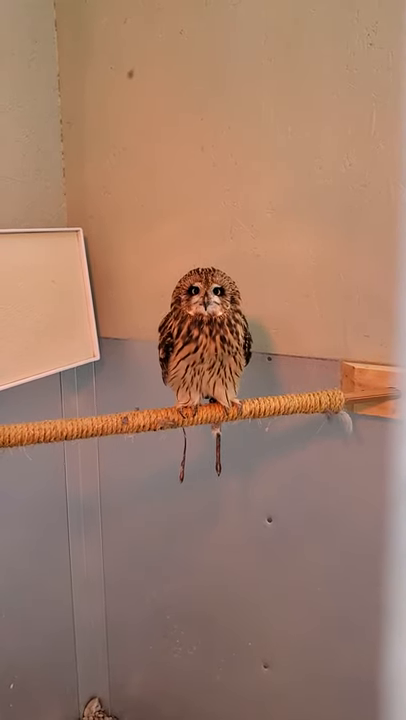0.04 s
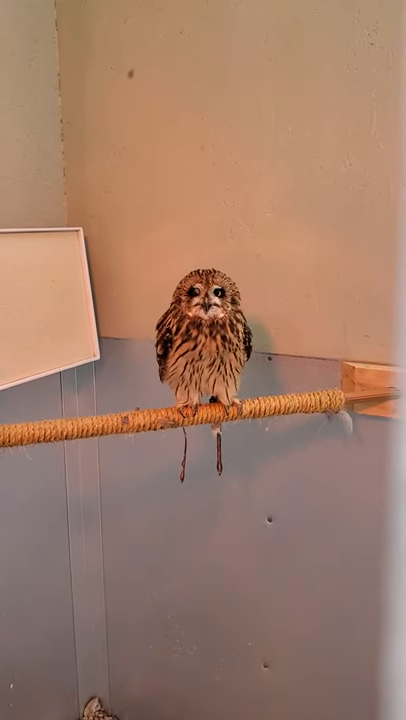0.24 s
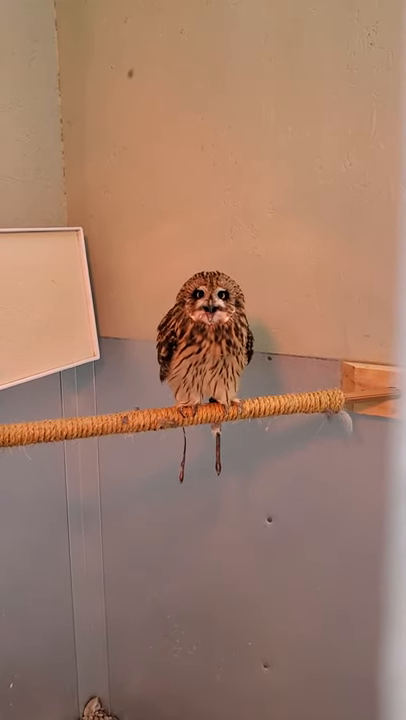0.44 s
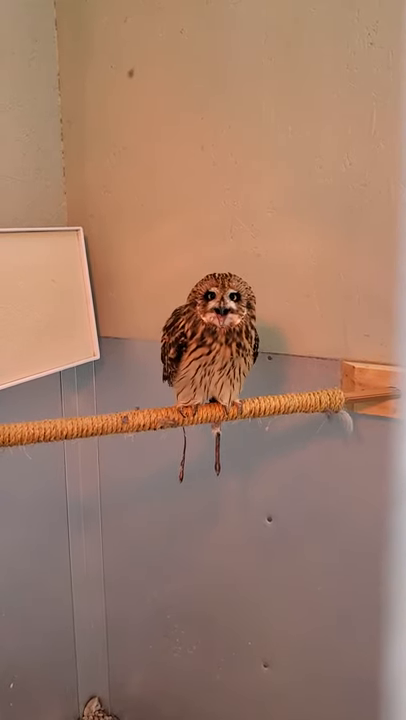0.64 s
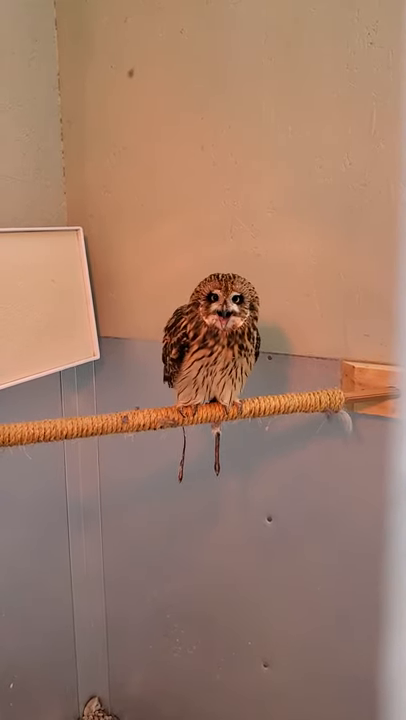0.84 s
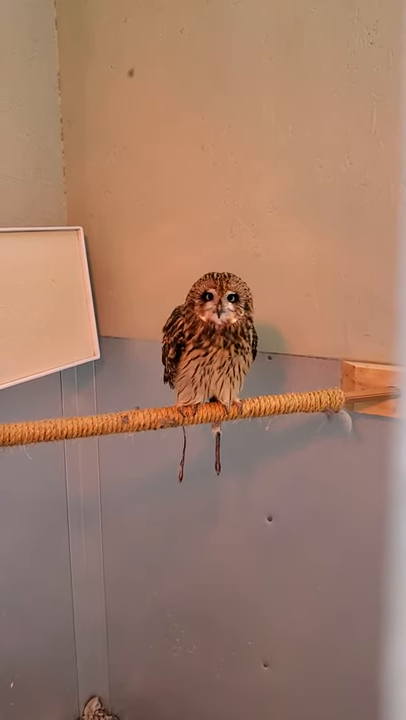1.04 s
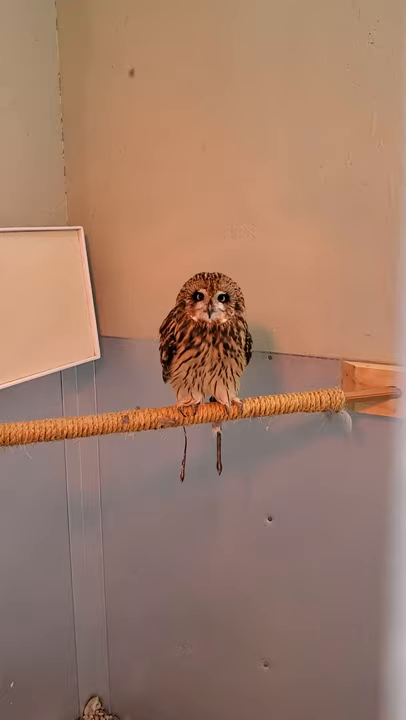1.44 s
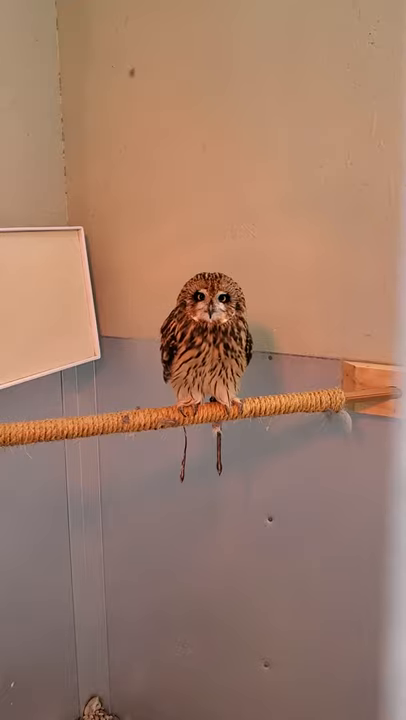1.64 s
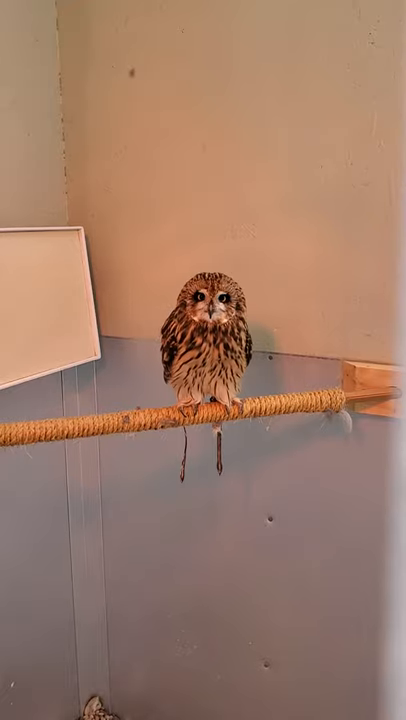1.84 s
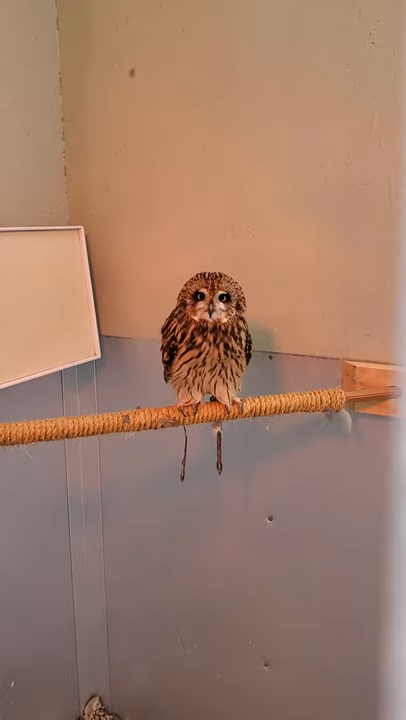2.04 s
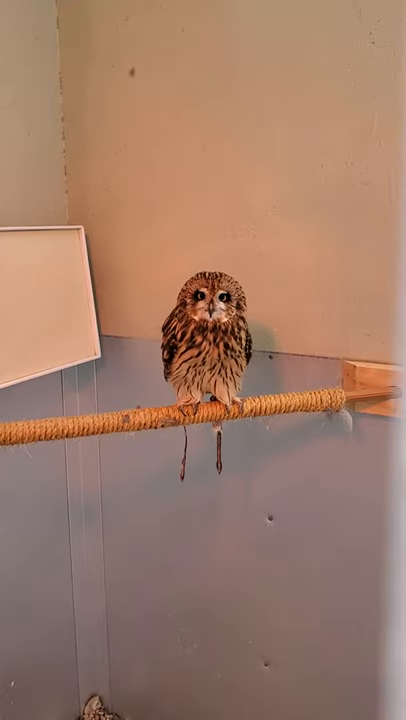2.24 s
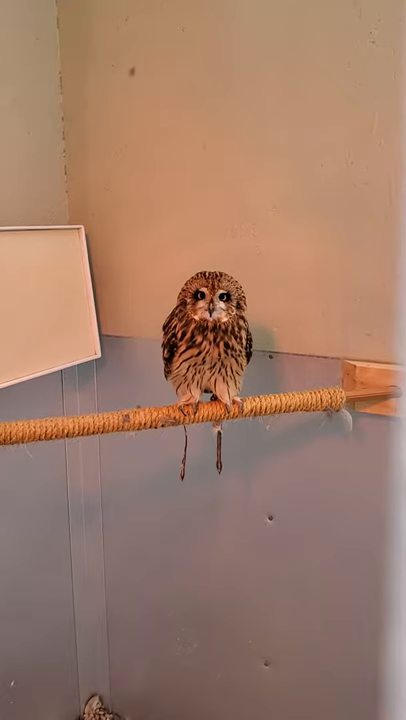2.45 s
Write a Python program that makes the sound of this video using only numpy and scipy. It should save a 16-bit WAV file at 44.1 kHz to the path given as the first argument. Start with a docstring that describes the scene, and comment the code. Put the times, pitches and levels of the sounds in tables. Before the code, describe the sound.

One long, raspy owl screech indoors, with four soft hoots from a second owl farther off.

```python
"""A small hard-walled enclosure, in stereo. On a perch near the microphones, a little left of centre, an owl
gives one long screech: its flapping syrinx rings the throat in a rasp that swells, climbs as the rattle
tightens, and ends in a falling whistle. Another owl, out of sight, hoots four times in soft, almost pure
notes. Under them lie a low room rumble, a soft rumbling puff and a dull bump."""
import sys
import numpy as np
from scipy import signal
from scipy.fft import rfft, irfft
from scipy.io import wavfile
from scipy.ndimage import uniform_filter1d

SR = 44100
rng = np.random.default_rng(int(sys.argv[2]) if len(sys.argv) > 2 else 0)


def output_pcm(signal):
    """Save a mono or channel-first signal as 16-bit PCM at the path in sys.argv[1].

    Samples are clipped to [-1, 1] before scaling.
    """
    pcm = np.clip(np.atleast_2d(signal).T, -1, 1) * 32767
    wavfile.write(sys.argv[1], SR, np.round(pcm).astype(np.int16))


N = 114660
TIME, FREQ = np.arange(N) / SR, np.fft.rfftfreq(N, 1 / SR)
SCREECH_START_S, SCREECH_STOP_S = .183, 1.068


def screech():
    """The near owl: snaps and gusts of air ring its throat, and the rasp breaks into a whistle."""
    # Three throat resonances, low to high: t/s, f1/Hz, f2/Hz, f3/Hz
    throat = [(.185, 660, 1420, 2020), (.228, 930, 1750, 2600), (.28, 800, 1485, 2360),
              (.39, 990, 1768, 2650), (.54, 985, 1747, 2702), (.67, 1000, 2005, 2660),
              (.83, 1020, 2077, 2704), (.9, 1090, 2141, 2860), (.94, 1240, 2553, 2710),
              (1.002, 1500, 2401, 2770), (1.03, 1190, 2044, 2520), (1.064, 890, 1990, 2575)]
    # Relative strength of the rasp in each: t/s, level1/dB, level2/dB, level3/dB
    rasp = [(.19, -35.5, -40.5, -56.5), (.25, -44, -36.5, -47.5), (.38, -40.5, -35, -34),
            (.47, -36.5, -37.5, -34.5), (.55, -37, -34.5, -28), (.62, -33.5, -35.5, -32),
            (.72, -31.5, -31, -24.5), (.81, -28.5, -30.5, -22), (.89, -26.5, -24.5, -26.5),
            (.945, -28, -23, -20.5), (.995, -15, -27.5, -16.5), (1.025, -24, -24.5, -29.5),
            (1.055, -27, -33.5, -62.5)]
    # Relative strength of the whistle on the first resonance: t/s, level/dB
    whistle_level = [(.2, -34), (.3, -56.5), (.7, -48), (.82, -33), (.93, -34.5), (1.015, -22.5),
                     (1.049, -12.5), (1.06, -26)]
    # Lead at the left microphone: f/Hz, phase/rad
    left_lead = [(0, -0.5), (1380, 1.35), (2070, 6.5), (9300, 10.5), (10600, 10), (12100, 15.5),
                 (14300, 24.5), (15400, 23)]
    leak, turbulence, breathiness = .12, .75, 2.7
    hz1, hz2, hz3 = in_time(throat)
    gain1, gain2, gain3 = from_db(in_time(rasp))
    snaps, flow = rattle()
    throat_air, chest_air, upper_air = (flow + leak) * rng.standard_normal((3, N))
    drive = snaps + turbulence * throat_air
    steady_air = breathiness * rng.standard_normal(N)
    low = gain1 * resonate(drive + steady_air, hz1, width_hz=185) + chest(chest_air)
    second = resonate(drive, hz2, width_hz=223)
    third = resonate(drive, hz3, width_hz=267)
    fourth = from_db(-8) * resonate(upper_air, 1.158 * hz3, width_hz=523.5)
    mid = gain2 * second + gain3 * even(third + fourth)
    mid += whistle(hz2, db=-20.5) * gate(.912, .022, .99, .022)   # the second sings too at the climax
    hiss = beak_hiss(flow)
    low += whistle(hz1, db=in_time(whistle_level)[0])
    voice = pan(low, left_db=2.3) + pan(mid, left_db=.5) + pan(hiss, left_db=2.5)
    voice *= gate(SCREECH_START_S, .0076, SCREECH_STOP_S, .024)
    return lead_left(voice, np.interp(FREQ, *np.transpose(left_lead)))


def rattle(count=500, jitter=.2, gust_sigma_s=.0013):
    """The syrinx flaps, strong and weak in turn: returns its snaps and the airflow they let through."""
    # Looseness of the rattle: t/s, flap rate/Hz, spread of strength/dB
    flapping = [(.19, 300, 1), (.28, 150, 2.5), (.37, 102, 4.3), (.75, 108, 4), (.82, 200, 1.6),
                (1.0, 260, 1)]
    rate, spread_db = in_time(flapping)
    turns = np.cumsum(np.exp(jitter * rng.standard_normal(count)))
    at = np.minimum(np.searchsorted(np.cumsum(rate) / SR, turns), N - 1)
    strong_weak = .7 * (-1) ** np.arange(count) + .65 * rng.uniform(-1, 1, count)
    snaps = np.zeros(N)
    snaps[at] = from_db(spread_db[at] * strong_weak)
    gust = signal.windows.gaussian(401, gust_sigma_s * SR)
    return even(snaps), even(np.convolve(snaps, gust, "same"))


def resonate(x, hz, width_hz, size=32):
    """One moving throat resonance, applied twice for steep skirts and held at an even level."""
    radius = np.exp(-np.pi * width_hz / SR)
    y, state = np.zeros(N), np.zeros((2, 2))
    for i in range(int(SCREECH_START_S * SR), int(SCREECH_STOP_S * SR), size):
        feedback = [1, -2 * radius * np.cos(2 * np.pi * hz[i] / SR), radius * radius]
        block = x[i:i + size]
        for k in range(2):
            block, state[k] = signal.lfilter([1 - radius, 0, radius - 1], feedback, block, zi=state[k])
        y[i:i + size] = block
    return even(y)


def chest(air):
    """Pulsing air gives the rasp its broad, low body."""
    # Relative strength of the body: t/s, level/dB
    level = [(.19, -41), (.3, -39.5), (.6, -39.5), (1.05, -40)]
    # Its spectral shape: f/Hz, level/dB
    spectrum = [(60, -31.5), (200, -9.5), (420, -9), (640, -3), (745, 5.5), (860, -6.5), (1400, -13),
                (2500, -12), (5000, -42)]
    return from_db(in_time(level)[0]) * even(colour(air, spectrum))


def beak_hiss(flow, leak=.08, top_hz=9510):
    """Air pulses through the beak in a hiss that starts dull and brightens as the beak opens."""
    # Relative strength of the hiss: t/s, level/dB
    level = [(0.19, -72), (0.208, -51), (0.336, -45.5), (0.81, -38.5), (0.85, -40.5), (1.012, -31),
             (1.06, -42)]
    # Its spectral shape: f/Hz, level/dB
    spectrum = [(2500, -23.5), (3600, 1.5), (4200, -5.5), (5100, -7.5), (5800, 6), (6700, -2), (7700, -1),
                (8700, -9), (10200, -13), (11400, -4.5), (12300, -5.5), (13800, -22), (15500, -12)]
    # Cut or lift above top_hz: t/s, gain/dB
    top_gain = [(.2, -23.5), (.4, -3), (.92, 2), (1.03, 5)]
    air = (flow + leak) * rng.standard_normal(N)
    hiss = even(colour(air, spectrum))
    top = signal.sosfiltfilt(signal.butter(4, top_hz, "high", fs=SR, output="sos"), hiss)
    hiss += (from_db(in_time(top_gain)[0]) - 1) * top
    return from_db(in_time(level)[0] + 3.5) * hiss


def whistle(hz, db, unsteadiness=.033, octave_db=-33, size=60):
    """A throat resonance sings: a slightly unsteady tone with a weak octave."""
    wobble = uniform_filter1d(rng.standard_normal(N), size) * np.sqrt(size)
    phase = 2 * np.pi * np.cumsum(hz * (1 + unsteadiness * wobble)) / SR
    return np.sqrt(2) * from_db(db) * (np.sin(phase) + from_db(octave_db) * np.sin(2 * phase))


def hoots(base_hz=286.4, fade_s=.012, octave_db=-51.5, air_db=-26, left_lead_s=.00013):
    """The far owl: soft notes that arch and sag in pitch, with a faint octave and a little air."""
    # Relative loudness, one curve a hoot: t/s, level/dB
    levels = [
        [(.195, -47), (.233, -27), (.27, -27.5), (.289, -42.5), (.329, -25.5), (.361, -47), (.387, -33.5),
         (.46, -42)],
        [(.475, -63), (.503, -26), (.555, -21.5), (.63, -28), (.68, -21.5), (.71, -33), (.77, -26), (.809, -46),
         (.847, -33), (.95, -54)],
        [(1.32, -58.5), (1.372, -28.5), (1.43, -26.5), (1.455, -31.5), (1.485, -25), (1.535, -25.5),
         (1.574, -39.5), (1.595, -31.5), (1.622, -29.5), (1.637, -42.5), (1.657, -33), (1.7, -29),
         (1.75, -51.5), (1.785, -41), (1.87, -57)],
        [(1.955, -57.5), (2.005, -30), (2.045, -31), (2.09, -25.5), (2.2, -29.5), (2.224, -45.5), (2.24, -31),
         (2.275, -30), (2.42, -62)],
    ]
    # Top of each hoot's pitch arch: t/s, f/Hz, half-width/s
    arches = [(.24, 301.6, 0.22), (0.599, 308.7, .14), (1.491, 311.7, 0.1127), (2.12, 301.6, .12)]
    # Spectral shape of the rush around each hoot: f/Hz, level/dB
    air_spectrum = [(60, -15), (230, 2.5), (450, -7), (650, -14.5), (4000, -90)]
    out, air = np.zeros(N), colour(rng.standard_normal(N), air_spectrum)
    bend, flutter_db = 1 + .005 * waver(), .6 * waver()
    for curve, (top_s, top_hz, width_s) in zip(levels, arches):
        start, stop = curve[0][0], curve[-1][0]
        hz = base_hz + (top_hz - base_hz) * np.exp(-((TIME - top_s) / width_s) ** 2)
        phase = 2 * np.pi * np.cumsum(hz * bend) / SR
        swell = from_db(in_time(curve)[0] - 1 + flutter_db)
        swell *= gate(start - fade_s, fade_s, stop + fade_s, fade_s)
        # The octave enters late and is gone before the note fades.
        octave = from_db(octave_db + 2 * flutter_db) * gate(start + .029, .025, stop - .14, .043)
        out += np.sqrt(2) * (swell * np.sin(phase) + octave * np.sin(2 * phase))
        out += from_db(air_db) * swell * air
    return lead_left(pan(out, left_db=1.5), 2 * np.pi * FREQ * left_lead_s)


def enclosure(near, far, gap_s=.0024):
    """The nearest walls, the room and the building return the screech; the hoots have their own tail."""
    # Decay of the room: f/Hz, T60/s
    room_t60 = [(1000, 0.42), (2500, .38), (6500, .39), (11000, 0.3), (15000, .36)]
    # Decay of the building's faint late echo: f/Hz, T60/s
    building_t60 = [(1200, 0.98), (2600, 0.68), (4500, .5), (6300, 1.4), (9000, .4)]
    walls = from_db(-2) * reverb(near, t60=.064, gap_s=0, shared=.35)
    room = from_db(-11) * reverb(near, room_t60, gap_s, shared=.11)
    building = from_db(-35.5) * reverb(near, building_t60, gap_s, shared=0)
    hoot_tail = from_db(-16) * reverb(far, t60=1.3, gap_s=gap_s, shared=.11)
    return walls + room + building + hoot_tail


def puff():
    """A soft rumbling puff under the start of the screech."""
    # Its swell and fade: t/s, level/dB
    level = [(.24, -68), (.275, -38.5), (.33, -44), (.375, -33), (.52, -47.5), (.85, -79)]
    # Its spectral shape: f/Hz, level/dB
    spectrum = [(30, -36.5), (66, -3.5), (110, -6), (170, -11), (800, -54.5)]
    return from_db(in_time(level)[0]) * centred_noise(spectrum)


def bump(at_s=1.727, attack_s=.011, t60_s=.17):
    """One dull bump during the third hoot: low noise that dies quickly."""
    # Its spectral shape: f/Hz, level/dB
    spectrum = [(30, -13), (70, -7.5), (250, -5), (520, -8.5), (1100, -48), (1900, -41), (6000, -79)]
    attack = np.clip((TIME - at_s) / attack_s, 0, 1)
    fade_db = -60 * np.abs(TIME - at_s) / t60_s
    return from_db(-39.5 + fade_db) * attack * centred_noise(spectrum)


def room_tone():
    """The steady low rumble of the room."""
    # Its spectral shape: f/Hz, level/dB
    spectrum = [(25, -10), (60, -4), (210, 5), (300, -1.5), (400, -3.5), (650, -8.5), (850, -18.5),
                (1150, -33), (4000, -40)]
    return from_db(-59.5) * centred_noise(spectrum)


def reverb(x, t60, gap_s, shared):
    """Dense reflections, partly shared by both sides; t60 is one time or a table by frequency."""
    noise = rng.standard_normal((3, SR))
    pair = np.sqrt(shared) * noise[0] + np.sqrt(1 - shared) * noise[1:]
    f, t, cells = signal.stft(pair, SR, nperseg=128)
    if np.ndim(t60):
        t60 = np.interp(f, *np.transpose(t60))[:, None]
    _, tail = signal.istft(cells * from_db(-60 * t / t60), SR)
    tail = tail[:, :SR] * (TIME[:SR] > gap_s)
    tail /= np.sqrt(np.sum(tail ** 2, axis=1, keepdims=True))
    return signal.fftconvolve(x, tail, axes=1)[:, :N]


def centred_noise(spectrum, side_db=-12):
    """Coloured noise, nearly the same at both microphones."""
    mid, side = (colour(rng.standard_normal(N), spectrum) for _ in range(2))
    return mid + from_db(side_db) * side * [[1], [-1]]


def pan(x, left_db):
    """Place a sound by how much louder it is on the left."""
    return from_db([[left_db / 2], [-left_db / 2]]) * x


def lead_left(pair, radians):
    """The right microphone lags by a phase for each frequency."""
    left, right = pair
    return np.array([left, irfft(rfft(right) * np.exp(-1j * radians), N)])


def colour(x, spectrum):
    """Shape a spectrum; rms 1."""
    hz, db = np.transpose(spectrum)
    gain = from_db(np.interp(np.log(np.maximum(FREQ, 1)), np.log(hz), db))
    y = irfft(rfft(x) * gain, N)
    return y / np.std(y)


def even(x, size=1300):
    """Hold the short-term rms at 1."""
    power = uniform_filter1d(uniform_filter1d(x * x, size), size)
    return x / np.sqrt(np.abs(power) + 1e-12)


def waver(size=1100):
    """Random drift, some twenty turns a second; spread 1."""
    slow = uniform_filter1d(uniform_filter1d(rng.standard_normal(N), size), size)
    return slow / np.std(slow)


def gate(start, rise, stop, fall):
    """On between two times, with straight ramps; all in seconds."""
    return np.clip((TIME - start) / rise, 0, 1) * np.clip((stop - TIME) / fall, 0, 1)


def in_time(rows):
    """Each column of a curve at every sample."""
    times, *columns = np.transpose(rows)
    return [np.interp(TIME, np.sort(times), column) for column in columns]


def from_db(db):
    """Decibels to gain."""
    return 10 ** (np.asarray(db) / 20)


def scene():
    """Both owls and their reflections reach the microphones over the low background."""
    near, far = screech(), hoots()
    return from_db(-1.5) * near + far + enclosure(near, far) + puff() + bump() + room_tone()


def record(dry):
    """The recorder cuts the top steeply above 15750 Hz."""
    return signal.sosfilt(signal.ellip(12, .1, 80, 15750, fs=SR, output="sos"), dry)


dry = scene()
out = record(dry)
output_pcm(out)
```